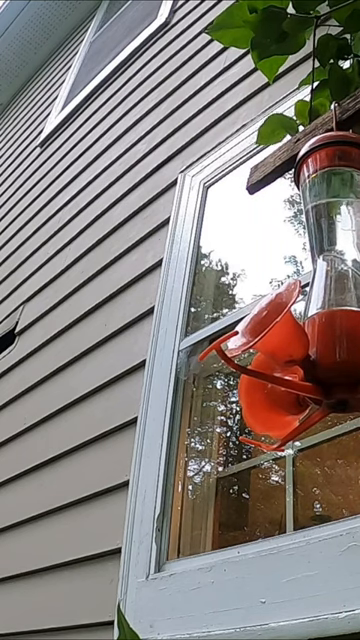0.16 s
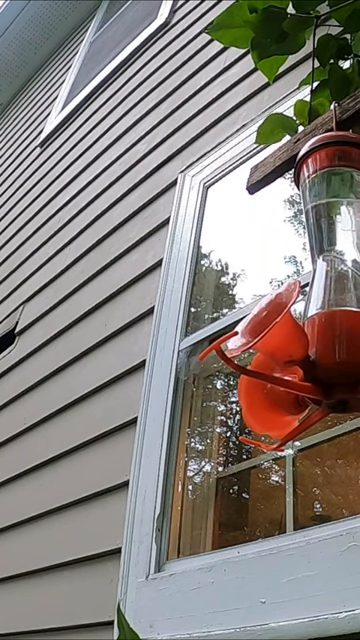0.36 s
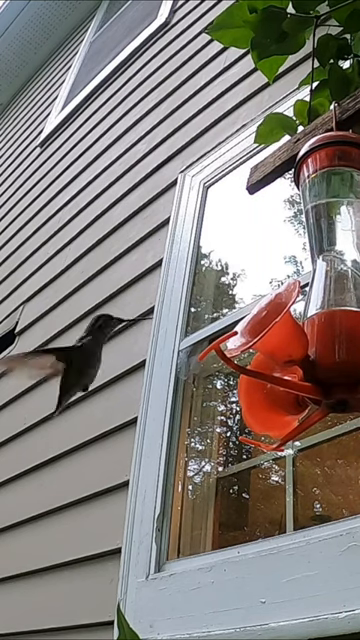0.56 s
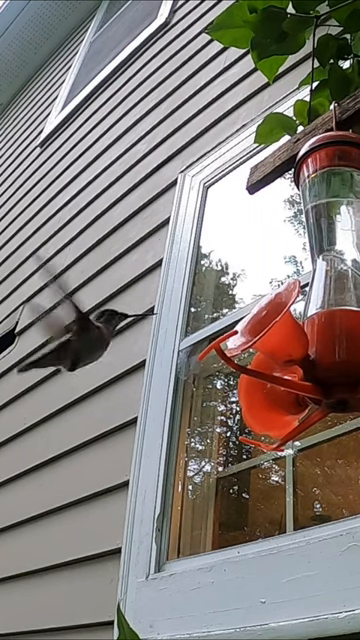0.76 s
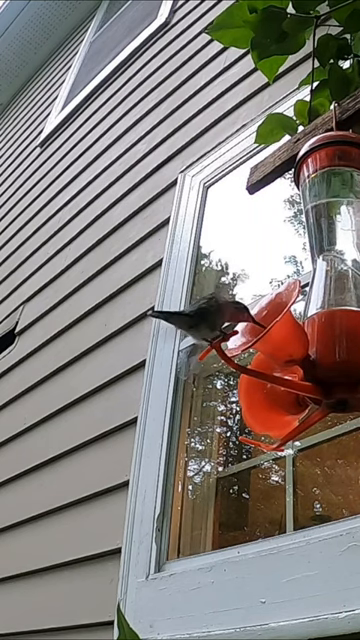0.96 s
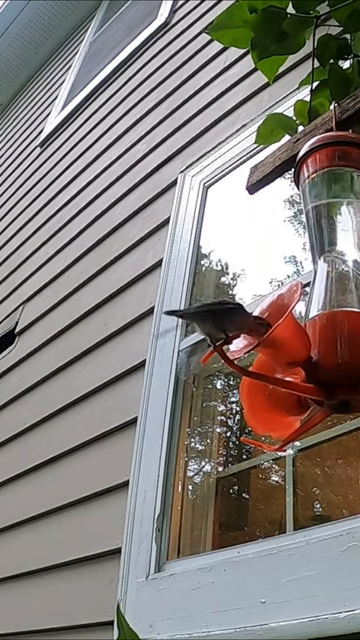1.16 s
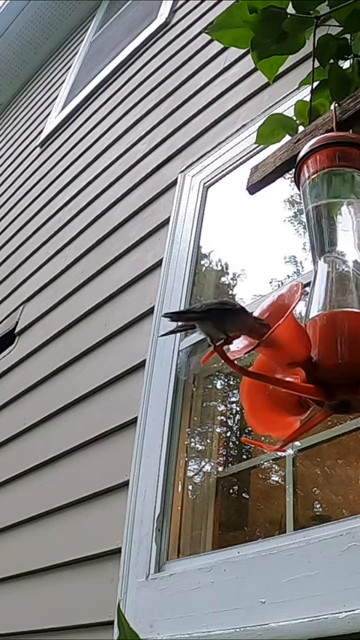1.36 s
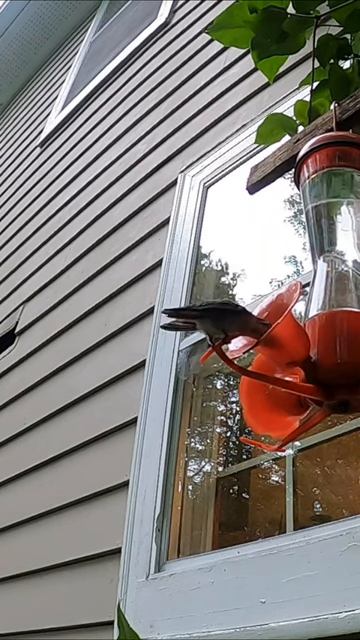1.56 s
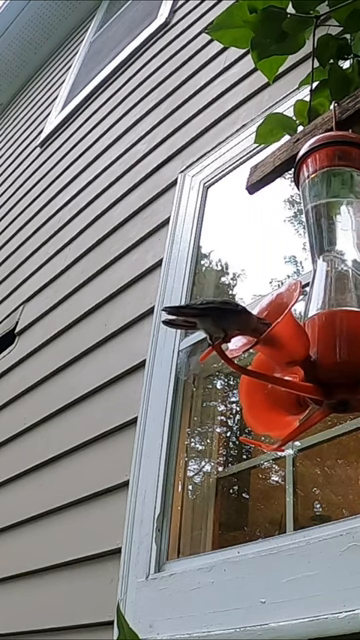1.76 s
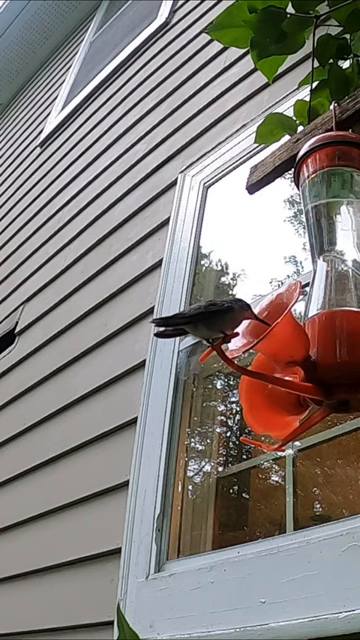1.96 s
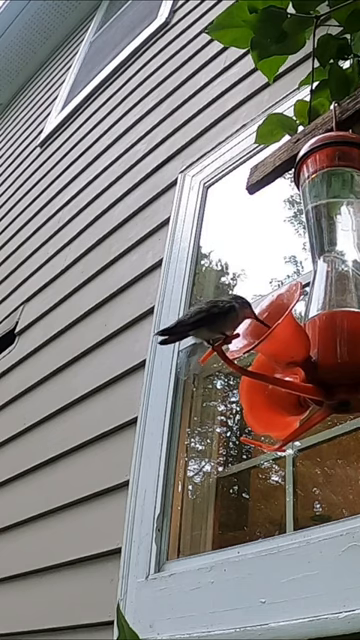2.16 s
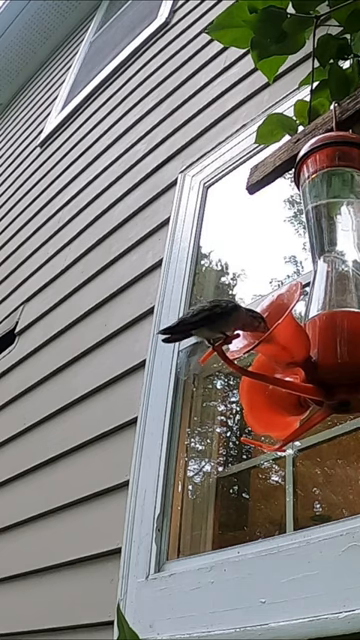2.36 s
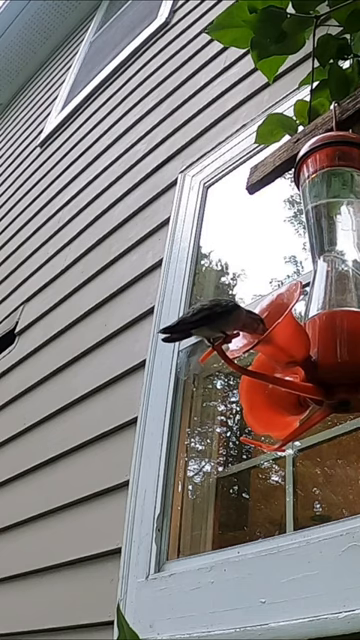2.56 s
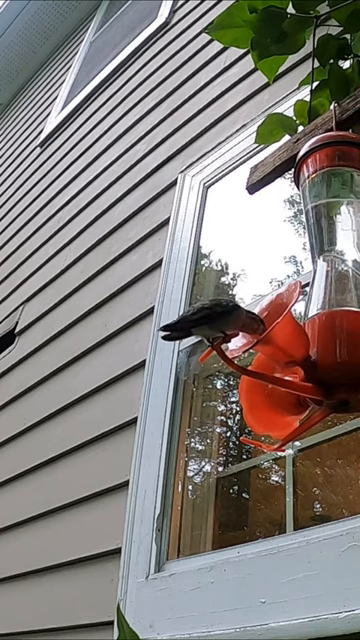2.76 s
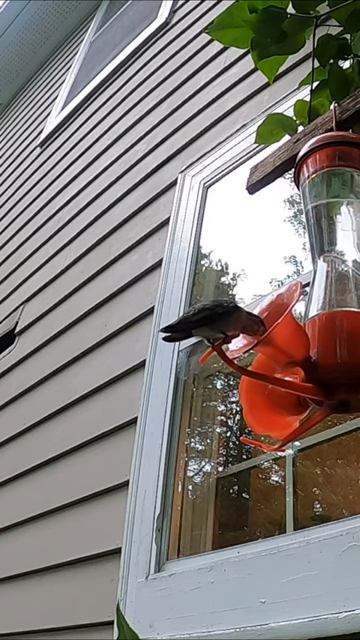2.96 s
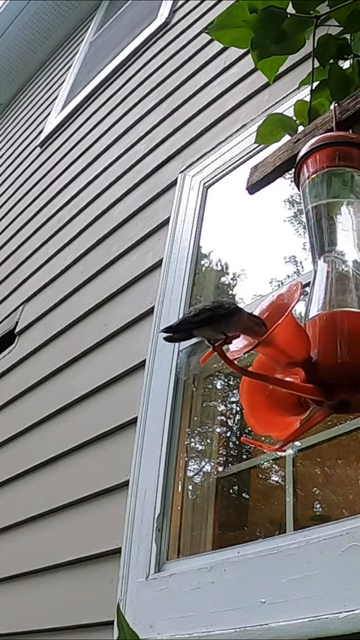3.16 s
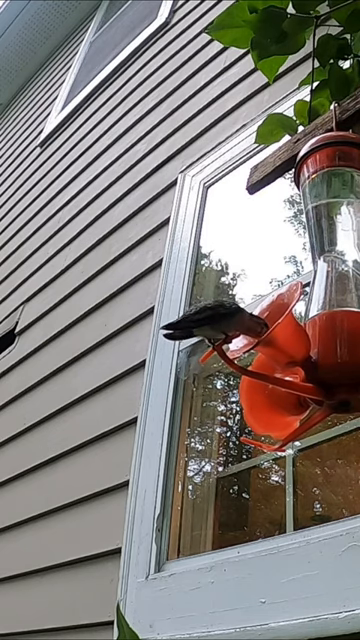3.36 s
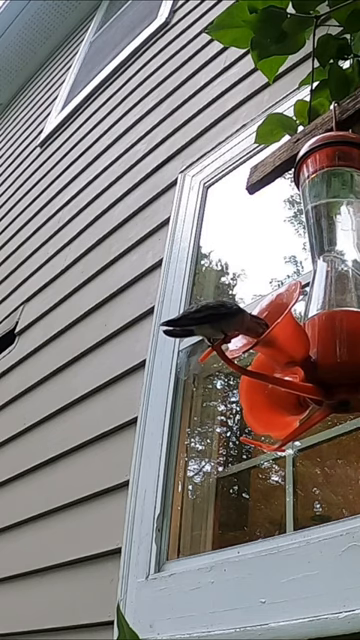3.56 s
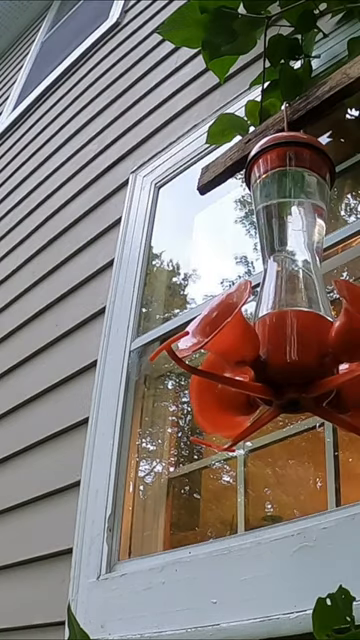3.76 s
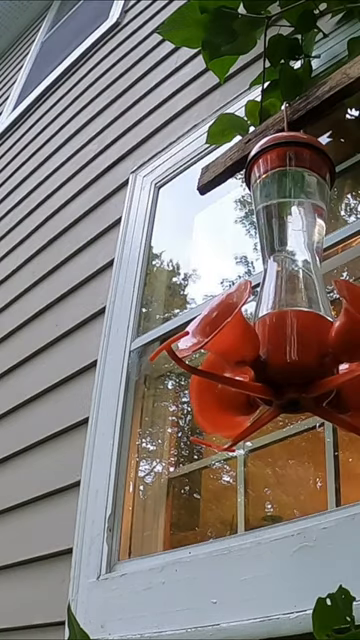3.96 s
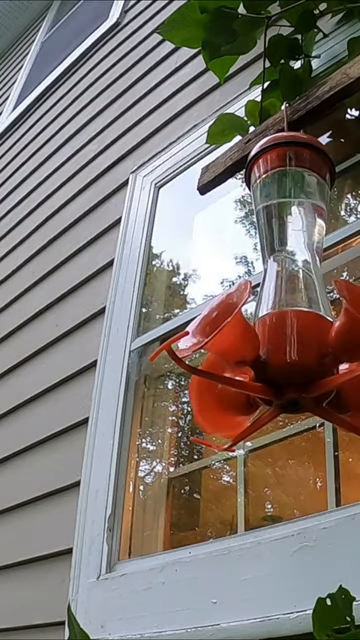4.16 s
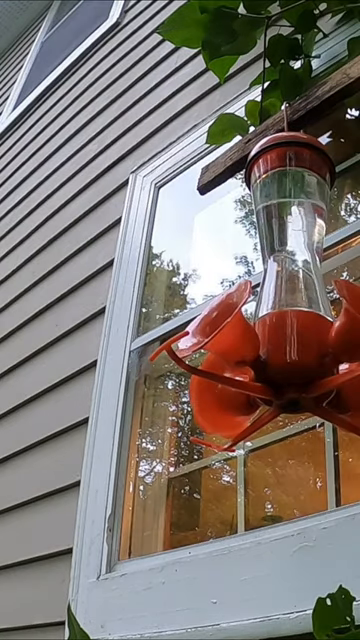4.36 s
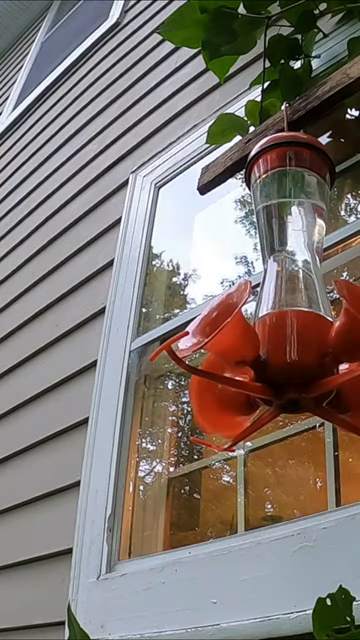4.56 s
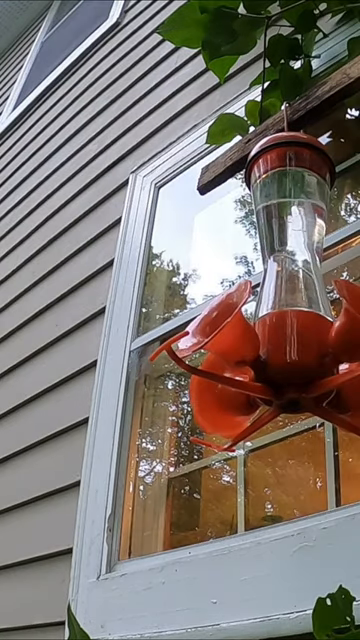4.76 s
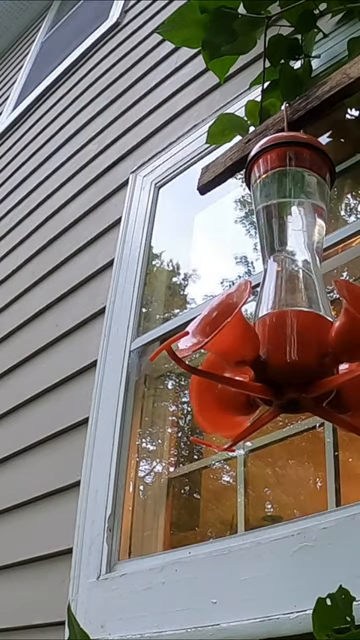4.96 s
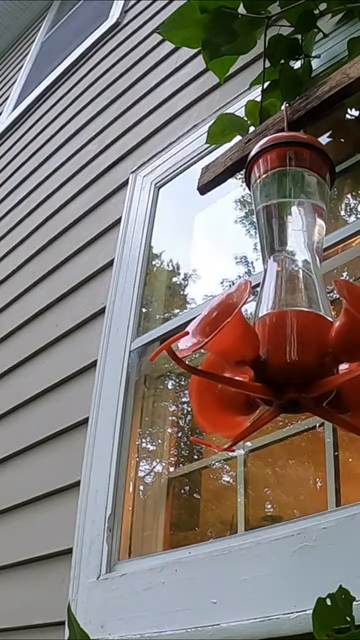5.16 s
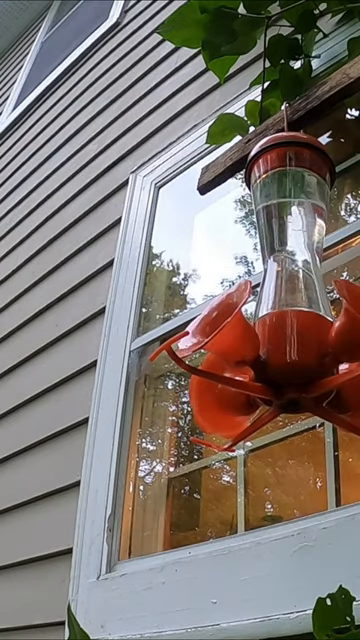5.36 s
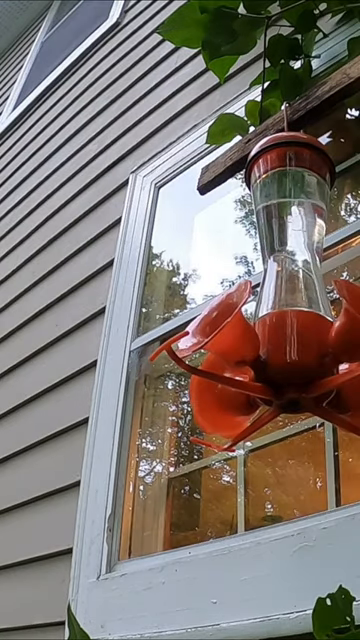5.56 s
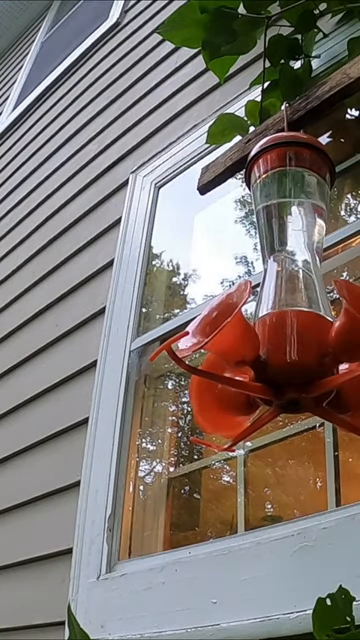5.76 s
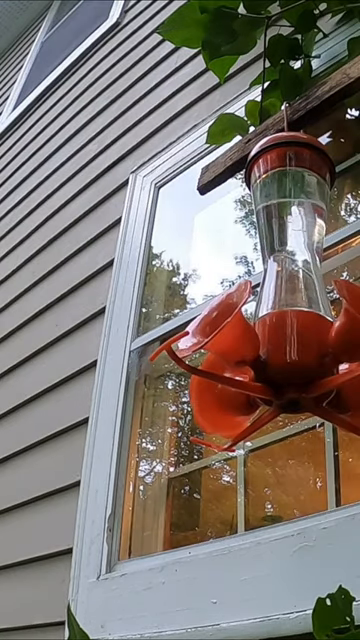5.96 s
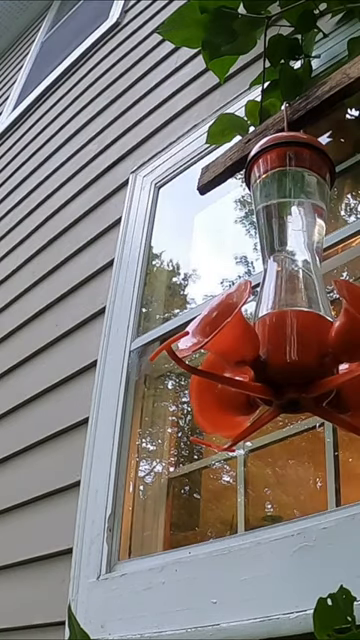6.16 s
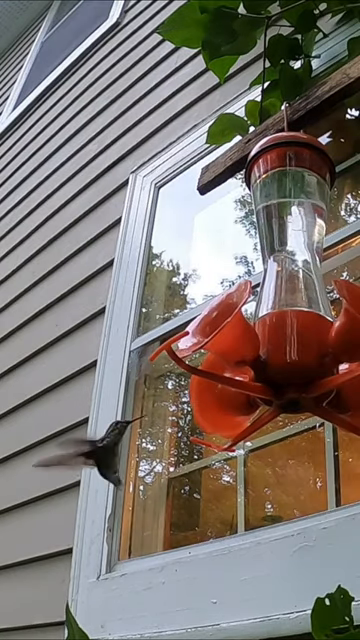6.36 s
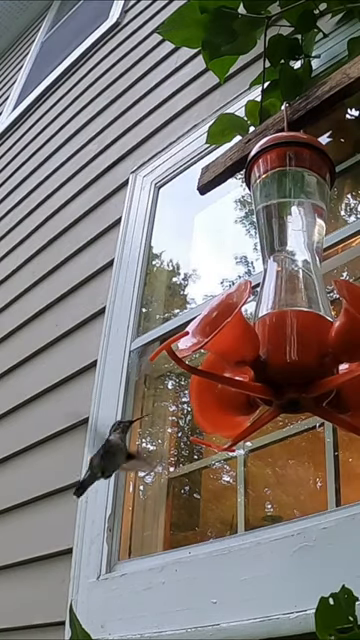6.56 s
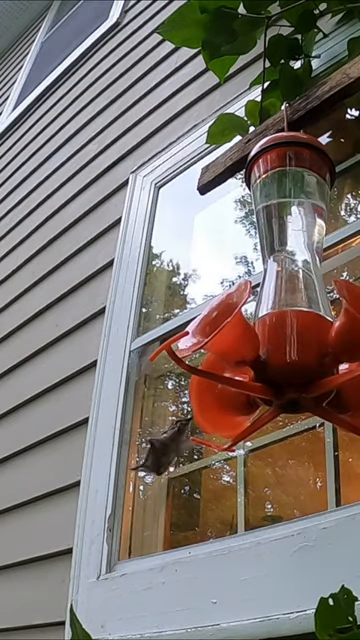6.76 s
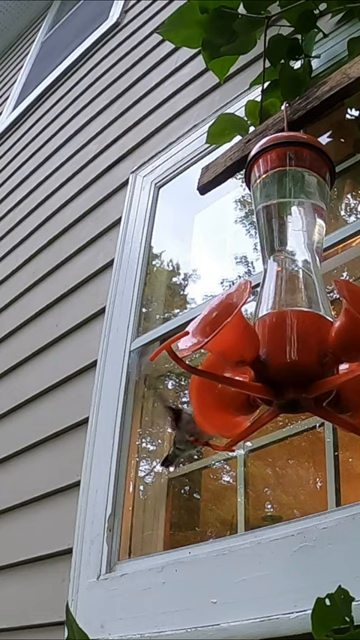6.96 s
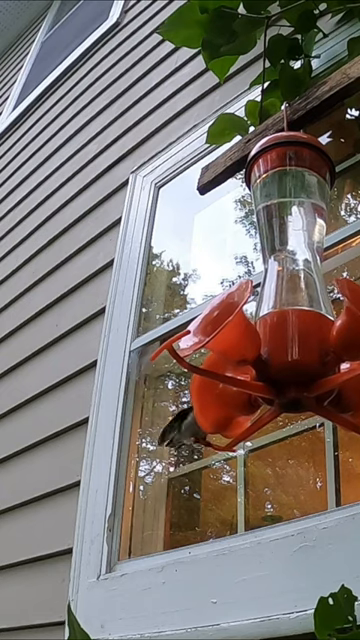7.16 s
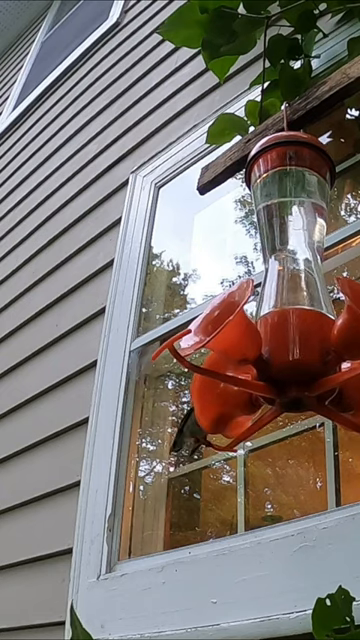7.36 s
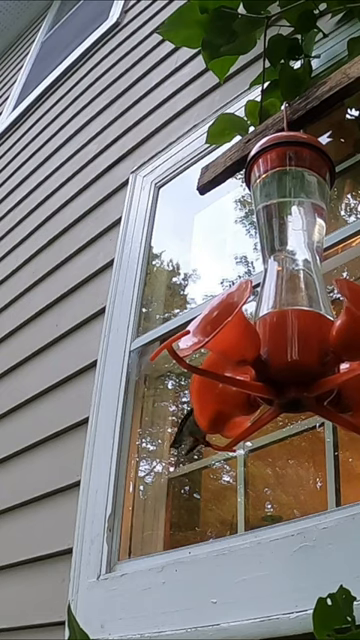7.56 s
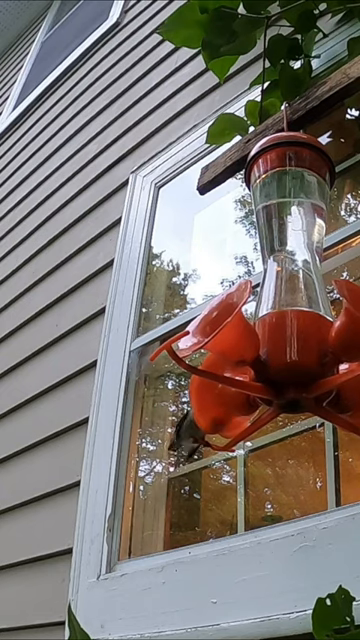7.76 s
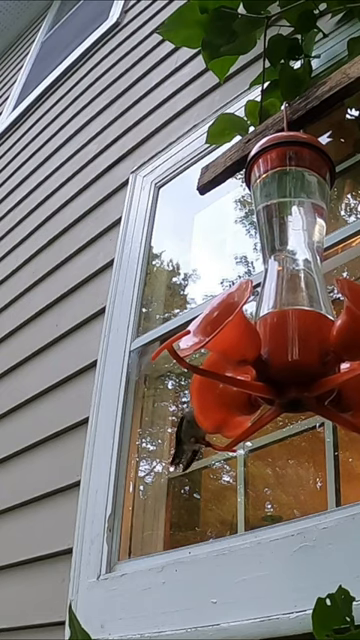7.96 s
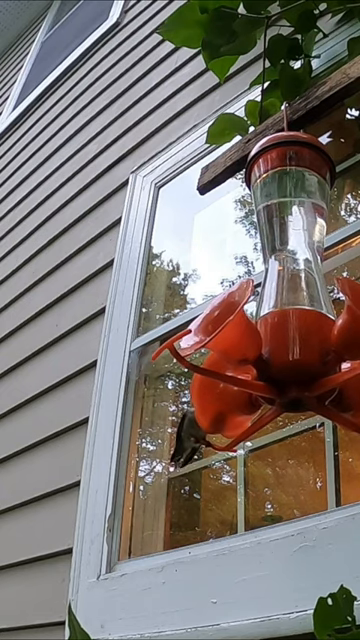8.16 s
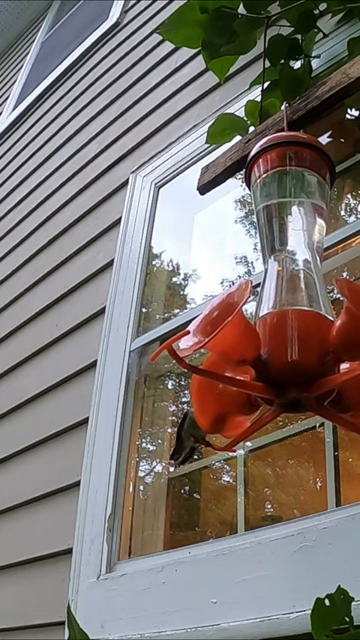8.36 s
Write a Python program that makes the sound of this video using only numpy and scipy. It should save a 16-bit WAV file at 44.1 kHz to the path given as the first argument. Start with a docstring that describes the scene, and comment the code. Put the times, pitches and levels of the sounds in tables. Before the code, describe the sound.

A quiet backyard beside a house wall, in stereo. From 0 s a hummingbird flies in close: a deep, throbbing wing hum near 50 beats per second with feathery puffs, strongest around 0.3-0.5 s, moving from the left toward centre, weakening and stopping near 1.2 s as it perches. Underneath, a soft low town hum, faint air hiss, and a high cricket chorus that rises during the first second, with steady trilling, triple-pulse chirps about twice a second and occasional single ticks. At 3.8 s a distant road's rush and low rumble enter abruptly, the rush slowly weakening. Faint bird whistles and buzzy calls appear around 4.1 and 4.7-4.9 s. From 5.4 to 7.1 s the wings return, quieter, in uneven swells. Sharp, tiny falling chips sound at 6.2 and 6.8 s, with a slight wall reflection. Thin upward whistles follow at 6.8-6.9 and 8.3 s, a faint buzz at 7.6 s; crickets and traffic continue.

```python
"""A hummingbird flies in to a feeder beside a house wall and perches; later it hovers again and chips twice.
Its wings sound as harmonics of the wingbeat with puffs of feather noise, its chips as falling harmonic notes
shaped by throat resonances. Crickets trill, chirp and tick as trains of short tones over a chorus of noise bands;
far birds give gliding whistles and buzzes. The town hums as shaped noise, and midway the rush of a distant road,
also shaped noise, sets in abruptly.
"""
import sys
import numpy as np
from scipy import signal
from scipy.fft import rfft, irfft, next_fast_len
from scipy.io import wavfile
from scipy.ndimage import map_coordinates

SR = 44100
rng = np.random.default_rng(int(sys.argv[2]) if len(sys.argv) > 2 else 0)


def master(y):
    """Save y as 16-bit WAV."""
    cut = np.clip(np.atleast_2d(y).T, -1, 1)
    pcm = np.round(cut * 32767)  # scale
    wavfile.write(sys.argv[1], SR, pcm.astype(np.int16))


def attenuation_scalar(level_db):
    """Turn a level in dB into a linear amplitude multiplier (20 dB per decade)."""
    decades = np.asarray(level_db, float) / 20
    return 10 ** decades


N = 374850
T = np.arange(N) / SR  # s

# Flights; lift and drag as heard change while the bird turns: (time [s], wingbeat [Hz], lift [dB], drag [dB],
# third harmonic [dB], wingtip snap [dB], feather swish [dB])
ARRIVAL_FLIGHT = [(0, 45.4, -34, -42, -53, -50, -63.5), (.13, 51.8, -34.5, -37.5, -46.5, -50, -70.5),
                  (.27, 48.93, -32.5, -39.5, -56, -48.5, -67), (.33, 48.1, -28, -39, -38, -47.5, -61),
                  (.39, 47, -41, -34.5, -30.5, -48, -59.5), (.44, 48.6, -27.5, -26.5, -33, -49.5, -59),
                  (.51, 49.7, -32.5, -47, -48.5, -49.5, -60.5), (.6, 48.4, -48, -47, -56, -57, -69.5),
                  (.655, 51.67, -37, -44, -64, -50.5, -58.5), (.715, 51.8, -55, -67, -62, -69, -72),
                  (.78, 51.17, -39, -42, -51, -60, -67.5), (.92, 49.3, -41.5, -44, -59, -64, -68),
                  (.975, 50.73, -36.5, -43, -50, -56, -59), (1.03, 52.4, -41, -44, -53, -64, -73),
                  (1.085, 56, -38, -54, -49, -57, -63.5), (1.17, 57, -64, -45, -69, -75, -83)]
HOVER_FLIGHT = [(5.42, 46.4, -69, -71, -60, -61.5, -73), (5.57, 47.9, -62, -51, -49, -50.5, -70),
                (5.66, 48.97, -47, -44, -44, -43, -57.5), (5.72, 52.06, -41, -35.5, -45.5, -44, -59),
                (5.78, 53.2, -41, -42, -61, -59, -57.5), (5.85, 51.4, -59, -56, -55, -51.5, -58.5),
                (5.93, 49.3, -61, -54, -52.5, -59, -67.5), (6.02, 46, -44, -41, -50.5, -56, -66.5),
                (6.1, 45.25, -63, -56, -59, -67, -80), (6.18, 46.4, -51.5, -41.5, -54, -52.5, -64),
                (6.27, 45.6, -52, -52, -58, -57, -64.5), (6.37, 47.83, -38, -37.5, -51, -52, -60),
                (6.49, 50.75, -62, -60, -56, -55.5, -61), (6.62, 46.22, -46, -43, -50.5, -57.5, -71),
                (6.8, 45.8, -53.5, -45, -53, -57, -63), (7.01, 52.2, -43, -40, -48, -59.5, -66),
                (7.14, 46.8, -62, -67, -60, -70, -76)]
# Harmonics of the wingtip snap, 4th upward, relative to the snap: (level [dB])
SNAP_OVERTONES = [-0.5, -0.5, -6.5, -8, -13, -17.5, -17.5, -21.5]
# Spectrum of the feather noise: (frequency [Hz], relative level [dB])
FEATHER_SPECTRUM = [(150, -18), (500, 14), (800, -1.5), (1400, 4.5), (7000, -1.5), (10000, -11),
                    (13000, -18), (15500, -51)]
# Chirping crickets, nominal start of each three-stroke chirp: (time [s])
CHIRP_TIMES = [0.508, 1.079, 1.672, 2.199, 2.815, 3.326, 4.143, 4.639, 5.232, 5.623, 6.283, 6.667, 7.166,
               7.795, 8.294]
# Single cricket ticks, nominal start: (time [s])
TICK_TIMES = [.986, 1.449, 1.93, 2.456, 2.929, 3.395, 5.335]
# Steadily trilling crickets: (pitch [Hz], stroke rate [1/s], level [dB])
STEADY_TRILLS = [(5563, 69.5, -74.5)]
# Bands of the far cricket chorus: (centre [Hz], Gaussian width [Hz], relative level [dB])
CHORUS_BANDS = [(5573, 196, 0.7), (5160, 110, -2.5), (5230, 490, -2.5), (4460, 150, -8), (6800, 510, -12)]
# Level of the far cricket chorus, which rises mostly in the first second: (time [s], level [dB])
CHORUS_LEVEL = [(0.0, -71.5), (1.04, -65), (8.5, -63.5)]
# Spectra of the town's hum and of the hiss of air: (frequency [Hz], relative level [dB])
TOWN_SPECTRUM = [(12, -39.5), (22, -0.5), (95, -12.5), (175, -5), (400, -15), (520, -22.5), (700, -32.5),
                 (1300, -30.5), (2600, -43.5), (5000, -84)]
AIR_SPECTRUM = [(1200, -30.5), (2500, -9.5), (3800, -10), (5000, -8.5), (7000, -12), (9000, -19.5),
                (12000, -26), (15000, -31)]
# Spectra of the distant road's rush and low rumble: (frequency [Hz], relative level [dB])
ROAD_RUSH_SPECTRUM = [(400, -15), (650, -5), (1300, 1.5), (1700, -7.5), (2200, -17.5), (3500, -28),
                      (8000, -100)]
ROAD_RUMBLE_SPECTRUM = [(15, -5.5), (80, 4.5), (130, -4), (300, -16), (550, -16), (1000, -64.5)]
# Far birds' whistles: (time [s], length [s], start pitch [Hz], end pitch [Hz], level [dB])
WHISTLE_NOTES = [(4.05, 0.1, 7450, 7640, -66.5), (4.705, 0.056, 5780, 6800, -57),
                 (6.795, 0.036, 6600, 7500, -59.5), (6.929, 0.036, 6270, 7730, -53.5),
                 (8.26, 0.055, 5700, 7540, -59.5)]
# Far buzzy calls: (time [s], length [s], centre [Hz], Gaussian width [Hz], level [dB])
BUZZ_NOTES = [(4.06, 0.091, 8100, 1100, -74), (4.907, 0.12, 8100, 800, -68.5),
              (7.64, 0.17, 7800, 1700, -69)]
# The hummingbird's chips, pitches without the initial overshoot:
# (time [s], length [s], start pitch [Hz], end pitch [Hz], level [dB], left minus right [dB])
CHIP_NOTES = [(6.2092, .0208, 2850, 1720, -37, 7), (6.832, .019, 2950, 1800, -36.5, 0)]
# Resonances of the hummingbird's throat: (frequency [Hz], gain [dB])
THROAT_RESONANCES = [(1800, -9), (2600, 0), (3300, -9), (4900, -1), (5700, -7), (6700, -1), (8000, -6),
                     (9500, -15), (13000, -31)]
# Likeness of the two channels of diffuse noise: (frequency [Hz], left-right likeness [0-1])
EAR_LIKENESS = [(60, 0.99), (950, 0.77), (3770, 0.21), (15000, 0.066)]
# Lean of diffuse noise: (frequency [Hz], left minus right [dB])
EAR_LEAN = [(60, -0.5), (950, 0.5), (3770, 5), (15000, -3.5)]

ROAD_START_S = 3.79


def unit(x):
    """Normalization: a signal divided by its rms has unit power."""
    return x / np.sqrt(np.mean(x ** 2) + 1e-20)


def along(points, hz):
    """Logarithmic pitch scale: values are interpolated linearly in log frequency."""
    f, value = np.transpose(points)
    return np.interp(np.log(hz + 1), np.log(f + 1), value)


def curves(rows):
    """Linear interpolation: each column after the time becomes one value per sample."""
    s, *columns = np.transpose(rows)
    return [np.interp(T, s, column) for column in columns]


def wobble(rate, size=N):
    """Slow random modulation: a smooth curve through rate random knots a second."""
    knots = rng.standard_normal(int(size * rate / SR) + 4)
    return map_coordinates(knots, [T[:size] * rate])


def filtered(x, response):
    """Linear filtering: the spectrum is multiplied by a response of frequency."""
    m = next_fast_len(N + 8192)
    return irfft(rfft(x, m) * response(np.fft.rfftfreq(m, 1 / SR)), m)[..., :N]


def placed(x, lean_db):
    """Level panning: a mono sound leans to the left by lean_db."""
    return np.array([x * attenuation_scalar(lean_db / 2), x * attenuation_scalar(-lean_db / 2)])


def rush(gain):
    """Diffuse-field coherence: noise of rms 1, near mono in the bass and almost unrelated in the treble."""
    turn = lambda hz: np.arccos(np.clip(along(EAR_LIKENESS, hz), 0, 1)) / 2
    spread = lambda hz: gain(hz) * [np.cos(turn(hz)), np.sin(turn(hz))]
    mid, side = filtered(rng.standard_normal((2, N)), spread)
    lean = lambda hz: attenuation_scalar(np.outer([.5, -.5], along(EAR_LEAN, hz)))
    return unit(filtered(np.array([mid + side, mid - side]), lean))


def shape(points):
    """Spectral envelope: a table of levels becomes a gain of frequency."""
    return lambda hz: attenuation_scalar(along(points, hz))


def sweep(length, start_hz, end_hz, bend):
    """Frequency glide: phase is the integral of pitch; bend over 1 spends longer near the end pitch."""
    u = np.linspace(0, 1, round(length * SR))  # progress, 0-1
    pitch = end_hz + (start_hz - end_hz) * (1 - u) ** bend
    return 2 * np.pi * np.cumsum(pitch) / SR, u


def add(track, s, sound):
    """Superposition: a short sound is summed into the track at s seconds."""
    i = round(s * SR)
    track[..., i:i + sound.shape[-1]] += sound[..., :N - i]


def echoes(x, t60, gap):
    """Reverberation: convolution with exponentially fading noise, different at each ear."""
    t = np.arange(SR // 2) / SR
    tail = rng.standard_normal((2, len(t))) * attenuation_scalar(-60 * t / t60) * (t > gap)
    both_ears = np.broadcast_to(x, (2, N))
    return signal.fftconvolve(both_ears, tail / np.linalg.norm(tail[0]), axes=1)[:, :N]


def wings(flight, crosses_s):
    """Periodic aerodynamic force: each stroke pushes the air once, giving a harmonic hum and feather puffs."""
    fourth_from_lift_db = -12.5
    drag_lag_rad, drift_rad = .5, .22  # drag trails lift; how far the harmonics drift out of line
    passes_s, turns_s = .39, .012  # the bird passes the microphone: lift turns from a push into a pull
    crossing_s, side_db, centre_db = 0.092, 3.5, 0.8  # left-right lean before and after crossing

    start, end = flight[0][0], flight[-1][0]
    span = slice(round(start * SR), round(end * SR))
    beat, lift_db, drag_db, third_db, snap_db, swish_db = (column[span] for column in curves(flight))
    t = T[span]
    drift = lambda rate: wobble(rate, size=len(beat))
    phase = 2 * np.pi * np.cumsum(beat * (1 + 0.0063 * drift(25))) / SR

    sizes = [attenuation_scalar(drag_db), attenuation_scalar(lift_db), attenuation_scalar(third_db)]
    sizes += [attenuation_scalar(snap_db + db) for db in SNAP_OVERTONES]
    sizes[3] = np.hypot(sizes[3], attenuation_scalar(fourth_from_lift_db + lift_db))
    sizes[1::2] = np.tanh((t - passes_s) / turns_s) * sizes[1::2]  # even harmonics turn over with the lift

    # aligned harmonics give one sharp dip in pressure a beat; higher ones flicker and drift as the bird turns
    hum = np.zeros(len(beat))
    for k, size in enumerate(sizes):
        flicker = attenuation_scalar(0.5 * k * drift(12))
        offset = drift_rad * np.sqrt(k) * drift(7) - drag_lag_rad * (k == 0)
        hum -= np.sqrt(2) * size * flicker * np.cos((k + 1) * phase + offset)

    # noise swells on both the down- and the upstroke
    puffs = unit(np.exp(0.25 * np.cos(phase) + 0.4 * np.cos(2 * phase)) * attenuation_scalar(1.5 * drift(140)))
    swish = attenuation_scalar(swish_db) * puffs * rush(shape(FEATHER_SPECTRUM))[:, span]
    flying = np.clip(np.minimum(t - start, end - t) / 0.0051, 0, 1)
    lean_db = np.interp(t, [crosses_s, crosses_s + crossing_s], [side_db, centre_db])
    out = np.zeros((2, N))
    add(out, start, flying * (placed(hum, lean_db) + swish))
    return out


def stroke(hz, db, lean_db):
    """Stridulation: one cricket wing stroke is a short, scratchy falling tone."""
    phase, u = sweep(0.019, hz * 1.04, hz * .96, bend=1)
    scratch = attenuation_scalar(db + 3.3 * wobble(300, size=len(u)))
    return placed(scratch * np.sin(phase) * np.sin(np.pi * u), lean_db)


def trill(hz, rate, db, uneven_db=2.0):
    """Pulse-train modulation: unbroken wing strokes, slightly uneven in pace and strength."""
    cycle = np.cumsum(rate * (1 + 0.01165 * wobble(1.5))) / SR % 1
    closing = np.minimum(cycle / .7, 1)  # sound for 0.7 of each cycle, then a rest
    pitch = hz * (1 + .012 * (.5 - closing) + .007 * wobble(60))
    tone = np.sin(np.pi * closing) * np.sin(2 * np.pi * np.cumsum(pitch) / SR)
    strength = attenuation_scalar(db + uneven_db * (.6 * wobble(5) + wobble(30)))
    return placed(strength * unit(tone), lean_db=3)


def crickets():
    """Superposed stridulation: trills, chirps and ticks stand out; many far crickets blur into bands of hiss."""
    near = sum(trill(*row) for row in STEADY_TRILLS)
    # a low triller, heard only in the part before the road
    near += (T < ROAD_START_S) * trill(hz=3335, rate=40.2, db=-82.5, uneven_db=1.7)
    for s, scatter in zip(CHIRP_TIMES, rng.normal(0, 1.8, (len(CHIRP_TIMES), 3, 2))):
        for k, (low_db, high_db) in enumerate(scatter):
            add(near, s - .004 + .042 * k, stroke(4380 + 12 * high_db, -66.3 + low_db, lean_db=2))
            # a higher neighbour joins just ahead of the later strokes
            add(near, s - .016 + .042 * k, (k > 0) * stroke(4570, -68.5 + high_db, lean_db=9))
    for s in TICK_TIMES:
        add(near, s - .004, stroke(4400, -61.5, lean_db=-2.0))

    band = lambda f, hz, width_hz, db: attenuation_scalar(db) * np.exp(-.5 * ((f - hz) / width_hz) ** 2)
    bands = lambda f: sum(band(f, *row) for row in CHORUS_BANDS)
    far = attenuation_scalar(curves(CHORUS_LEVEL)[0] + wobble(5.5)) * rush(bands)
    return near + attenuation_scalar(-3) * echoes(near.mean(0), t60=.3, gap=.004) + far


def town():
    """Incoherent summation: far traffic merges into a low noise-like hum under a faint hiss of air."""
    hum = attenuation_scalar(-52.0 + 1.86 * wobble(5.3)) * rush(shape(TOWN_SPECTRUM))
    hiss = attenuation_scalar(-72.0 + 0.85 * wobble(4.5)) * rush(shape(AIR_SPECTRUM))
    return hum + hiss


def road():
    """Broadband noise of distant traffic: rush and low rumble set in abruptly; the rush slowly weakens."""
    rush_db, weakens_db_per_s, rumble_db = -56, 1.44, -48.5
    weakening_db = rush_db - weakens_db_per_s * (T - ROAD_START_S)
    traffic = attenuation_scalar(weakening_db + 1.65 * wobble(5)) * rush(shape(ROAD_RUSH_SPECTRUM))
    rumble = attenuation_scalar(rumble_db + 0.71 * wobble(5.7)) * rush(shape(ROAD_RUMBLE_SPECTRUM))
    onset = np.clip((T - ROAD_START_S) / .015, 0, 1)
    return onset * (traffic + rumble)


def far_birds():
    """Tonal glides and narrow-band noise: thin whistles and buzzy calls, trailing through the trees."""
    out = np.zeros(N)
    for s, length, start_hz, end_hz, db in WHISTLE_NOTES:
        phase, u = sweep(length, start_hz, end_hz, bend=2.1)
        add(out, s, attenuation_scalar(db + 4 * wobble(200, size=len(u))) * np.sin(phase) * np.sin(np.pi * u))
    for s, length, hz, width_hz, db in BUZZ_NOTES:
        band = lambda f: np.exp(-.5 * ((f - hz) / width_hz) ** 2)
        noise = unit(filtered(rng.standard_normal(N), band))
        size = round(length * SR)
        add(out, s, attenuation_scalar(db) * noise[:size] * np.hanning(size))
    return placed(out, 1.5) + attenuation_scalar(-2) * echoes(out, t60=.45, gap=.004)


def chips():
    """Source and resonator: falling harmonics swell as they cross the throat's resonances; the wall answers."""
    overshoot_hz, settles = 445, 0.087  # a chip starts sharp; decay constant as a share of its length
    out = np.zeros((2, N))
    hiss = rush(lambda hz: np.exp(-((hz - 6000) / 4000) ** 2))
    for s, length, start_hz, end_hz, db, lean_db in CHIP_NOTES:
        u = np.linspace(0, 1, round(length * SR))
        pitch = end_hz + (start_hz - end_hz) * (1 - u) + overshoot_hz * np.exp(-u / settles)
        phase = 2 * np.pi * np.cumsum(pitch) / SR
        note = np.zeros(len(u))
        for k in range(1, 6):
            # each harmonic breaks unevenly; the top ones are weak
            rasp = attenuation_scalar(3 * wobble(600, size=len(u)) - 5 * (k > 3))
            throat = attenuation_scalar(along(THROAT_RESONANCES, k * pitch))
            later_swell = u ** (0.09 * (k - 1))  # higher harmonics swell later in the note
            note += rasp * throat * np.sin(k * phase) * later_swell
        breath = attenuation_scalar(-10) * hiss[:, round(s * SR):][:, :len(u)]
        envelope = np.sin(np.pi * u ** .88) ** .6
        add(out, s, attenuation_scalar(db) * (placed(note, lean_db) + breath) * envelope)
    return out + attenuation_scalar(-10.5) * echoes(out.mean(0), t60=0.12, gap=0.00023)


def scene():
    """Linear superposition: the pressures of all sources add."""
    bird = wings(ARRIVAL_FLIGHT, crosses_s=0.541) + wings(HOVER_FLIGHT, crosses_s=5.6) + chips()
    return bird + crickets() + town() + road() + far_birds()


def roll_off(x):
    """The treble ends steeply here."""
    return signal.sosfilt(signal.butter(12, 15600, fs=SR, output="sos"), x)


def record(dry):
    """Interchannel delay: of two microphone ports a little apart, the left hears later at low pitches."""
    lag_s, lag_hz = 7e-5, 3520  # delay in the bass; the pitch scale on which it fades
    delay = lambda hz: hz * lag_s * np.exp(-(hz / lag_hz) ** 2)
    ports = lambda hz: np.exp(1j * np.pi * np.outer([-1, 1], delay(hz)))
    mix = filtered(dry, ports)
    return roll_off(mix)


dry = scene()
out = record(dry)
master(out)
```